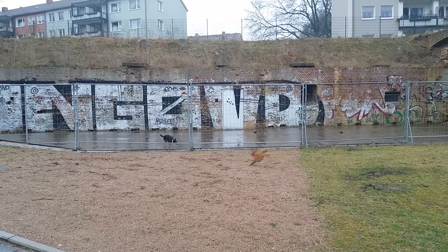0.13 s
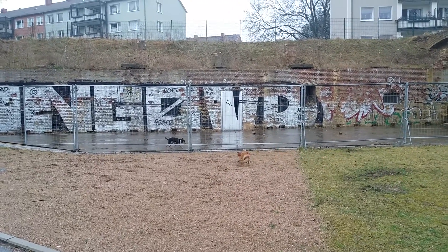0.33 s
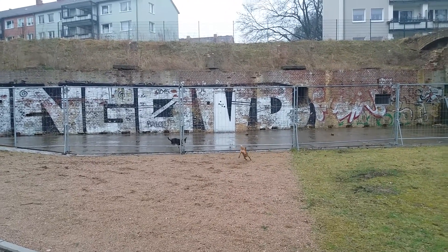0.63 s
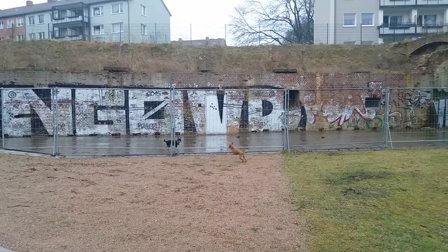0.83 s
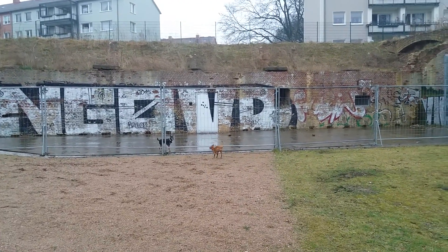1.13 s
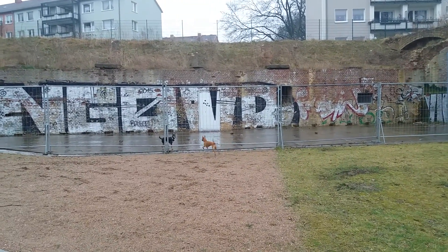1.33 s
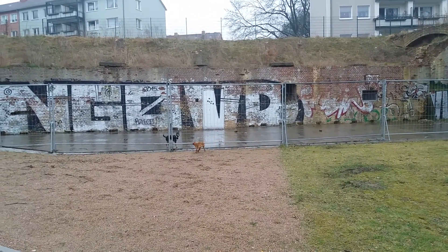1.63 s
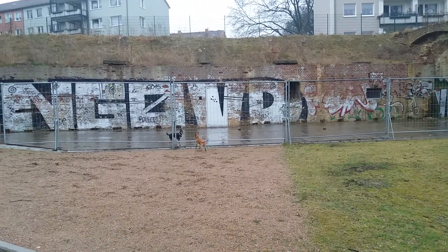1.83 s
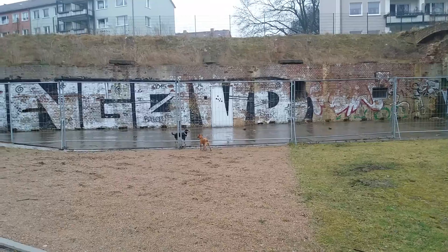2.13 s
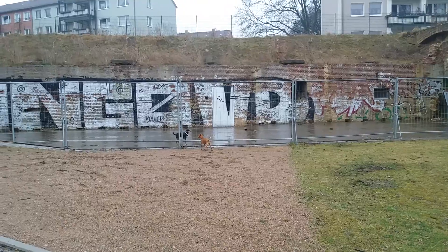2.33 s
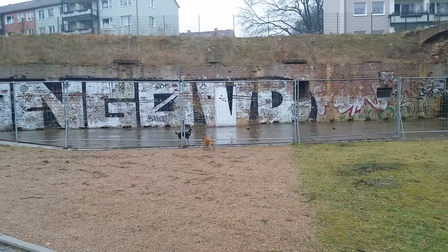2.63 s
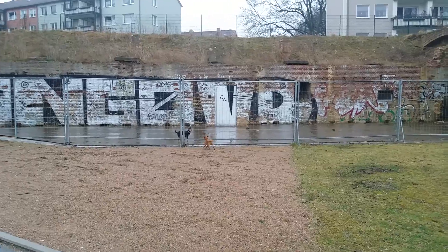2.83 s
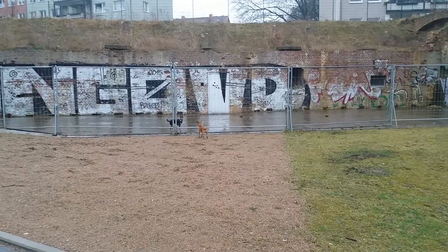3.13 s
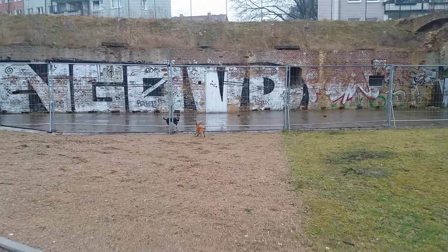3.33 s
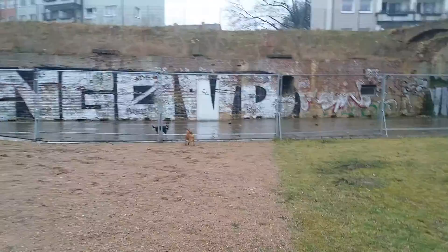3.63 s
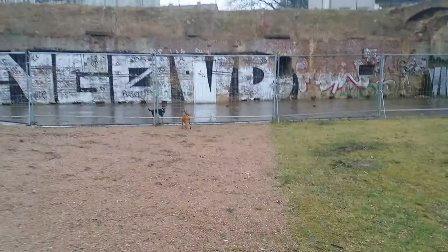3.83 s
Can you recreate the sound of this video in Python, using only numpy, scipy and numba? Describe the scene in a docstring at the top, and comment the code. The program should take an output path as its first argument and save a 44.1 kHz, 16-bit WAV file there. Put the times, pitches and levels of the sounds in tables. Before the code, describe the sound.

A small dog yaps twice quickly, then three more times with pauses, each bark echoing off a wall across an open yard. Wind buffets the microphone over faint distant traffic.

```python
"""Wind buffets the microphone over a distant town as a small dog yaps twice, across a gravel yard.
Each bark rises as a rasp and clears into a falling tone; a long brick wall slaps it back.
Grit crunches faintly close by. A bird chirps once at 1.1 s; the dog yaps again at 1.7 s and 2.8 s.
Around the fifth bark, at 3.5 s, the grit crunches louder and a faint hum swells and fades."""
import sys
import numpy as np
from scipy import signal
from scipy.fft import rfft, irfft, next_fast_len
from scipy.io import wavfile
from scipy.ndimage import map_coordinates
from numba import njit

SR = 44100
rng = np.random.default_rng(int(sys.argv[2]) if len(sys.argv) > 2 else 0)


def inscribe(sig):
    """Save sig as 16-bit PCM at rate SR to the path in sys.argv[1].

    A 1-D sig is mono; a 2-D sig holds one channel per row.
    Samples are clipped to [-1, 1] before scaling.
    """
    pcm = np.round(np.clip(np.atleast_2d(sig).T, -1, 1) * 32767)
    wavfile.write(sys.argv[1], SR, pcm.astype(np.int16))


N = 176400
LEAD = SR // 10  # samples before time zero
SIZE = N + LEAD
AGE_S = np.arange(SIZE) / SR
TIME_S = AGE_S - LEAD / SR

# traffic wash: freq_hz, density_db
TOWN_SPECTRUM = [(70, 5.5), (200, 3.5), (400, -3), (600, -1), (1000, -0.5), (1500, -3.5), (2200, -7),
                 (3000, -11), (4500, -17.5), (5000, -28), (5600, -36)]
# hum bands: centre_hz, level_db
HUM_BANDS = [(210, -43), (326, -47)]
# wind envelope: time_s, level_db
GUST_LEVELS = [(0, -21), (.07, -33), (.15, -25.5), (.25, -28.5), (.34, -28), (.58, -27.5), (.69, -23.5),
               (.85, -30.5), (1.0, -36.5), (1.45, -40.5), (1.75, -33.5), (2.05, -42.5), (2.28, -35.5),
               (2.47, -47), (2.62, -35), (2.76, -39), (2.9, -29), (3.16, -30), (3.4, -37), (3.6, -35.5),
               (4, -38)]
# wind rumble: freq_hz, density_db
WIND_SPECTRUM = [(26, -41), (36, -22), (50, -7.5), (70, 0.5), (115, -0.5), (170, -7), (250, -12),
                 (400, -21), (700, -36), (1500, -54)]
# eddies on the microphone: centre_s, peak_db, pitch_hz, half_length_s
EDDIES = [(.038, -10, 108, 0.007), (.125, -20, 140, 0.0049), (.154, -20, 123, .007),
          (.624, -12.5, 140, 0.0051), (.67, -11, 140, 0.005), (1.125, -26.5, 120, 0.013),
          (2.113, -23.5, 92, 0.012), (2.26, -26, 140, .011), (2.698, -22, 119, 0.006),
          (2.901, -16, 104, 0.008), (2.924, -24, 101, 0.013), (3.002, -19, 140, .006),
          (3.079, -18.5, 115, 0.0066), (3.85, -24, 91, 0.012)]
# yard reverberation: centre_hz, relative_db, t60_s
TAIL_BANDS = [(450, -5, .6), (840, 0, 0.69), (1566, 2, 1.12), (2520, -5.5, 0.69), (4500, 5, 0.82),
              (8000, 2.5, 0.61)]
# bird call: time_s, pitch_hz, level_db
CHIRP_CURVE = [(1.087, 3290, -66), (1.102, 4250, -53), (1.118, 4450, -55), (1.145, 4410, -55),
               (1.152, 4450, -78)]
# stones: start_s, level_db, decay_s
CRUNCHES = [(.258, -46, 0.018), (0.779, -54, 0.014), (3.352, -46, 0.014), (3.364, -39, .002),
            (3.392, -37, 0.0044), (3.403, -40, 0.0032), (3.41, -44, 0.0022), (3.418, -44, 0.0033),
            (3.585, -36, .001)]
# crunch noise: freq_hz, density_db
GRIT_SPECTRUM = [(500, -5), (1500, 5), (3000, 9), (5000, -4.5), (9000, -14.5), (12000, -37)]
# bark toward the wall, against the direct path: freq_hz, gain_db
FORWARD_RESPONSE = [(400, -4), (800, -6), (1200, -5), (1600, 1), (2400, 0.5), (3500, 3.5), (5000, 0.5),
                    (8000, 0.5), (14000, -5)]
# throat resonances, mouth open: centre_hz, width_hz
THROAT_BANDS = [(850, 263), (1330, 314), (2150, 267)]
# throat filter on the overtones: freq_hz, gain_db
THROAT_RESPONSE = [(1200, 1), (1700, -3.5), (2000, 0), (2400, 2.5), (2680, -8), (3000, -9.5), (3500, -17),
                   (4200, -38), (4750, -22.5), (5900, -44.5), (6400, -37), (7200, -38), (8000, -35)]
# upper muzzle resonances: centre_hz, width_hz, relative_db
MUZZLE_BANDS = [(3420, 440, -26), (4740, 390, -31), (5350, 580, -35), (6960, 970, -40)]
# breath hiss: freq_hz, density_db
BREATH_SPECTRUM = [(250, -4), (500, 3.5), (1500, 3.5), (2600, -12), (3000, -12.5), (4100, -21), (5300, -19),
                   (6200, -27), (9000, -30), (11000, -37.5), (15000, -52)]
# one curve per bark: time_s, pitch_hz, tone_db, rasp_db, roughness_ratio
BARK_CONTOURS = [
    [(-.06, 760, -43, -42, 0.44), (-.02, 1196, -22.5, -38, 0.65), (.008, 1346, -30, -34, .3),
     (.025, 1256, -33, -35, 0.42), (.044, 1155, -48, -33, 0.17), (.056, 893, -34.5, -36, 0.2),
     (.066, 773, -27, -56, 0.2)],
    [(.289, 688, -30.5, -35, 0.24), (.312, 803, -28.5, -24, 0.52), (.335, 923, -27, -31, 0.65),
     (.358, 980, -26.5, -23.5, 0.63), (.384, 920, -17.5, -37.5, 0.09), (.400, 797, -24.5, -42, 0)],
    [(1.733, 682, -34, -31.5, 0.56), (1.751, 794, -28.5, -26, 0.56), (1.776, 1326, -33, -27.5, 0.8),
     (1.793, 1244, -35, -27, 0.13), (1.801, 1202, -22.5, -35, 0), (1.822, 1172, -25, -35.5, 0.13),
     (1.835, 863, -28.5, -35, 0), (1.842, 773, -24.5, -31, 0)],
    [(2.751, 735.7, -32.5, -41, .25), (2.765, 819.4, -31, -28, 0.54), (2.803, 900, -40.5, -27, 1),
     (2.838, 924, -27.5, -29, 0.75), (2.854, 799, -22.5, -37, 0), (2.863, 690, -33.5, -38, 0.17)],
    [(3.493, 775, -29, -38.5, .1), (3.520, 835.3, -32.5, -29, 0.38), (3.555, 911.5, -32, -31.5, 0.8),
     (3.564, 871.7, -24.5, -29, 0.54), (3.586, 870, -29, -28, .35), (3.603, 760, -27, -36.5, 0.13)],
]
# per bark: second_partial_db, higher_partials_db, formant_ratio, throat1_db, throat2_db, throat3_db,
# echo_delay_s, echo_db
BARK_TIMBRES = [ (-11.5, -9.5, 1.132, 0.5, 3.5, -1, .05, -8.5),
                (-13.5, -16, 1.103, 3, -8.5, -1.5, 0.051, -4),
                (-11.5, -13.5, 1.017, -1, -1.5, -5.5, .046, 1),
                (-16, -23, 0.965, -3.5, 0.5, -5.5, 0.05, -2), (-16, -24, 1.015, 3.5, -0.5, -7.5, .047, -2)]


def amp(db):
    """Decibels to gain."""
    return 10 ** (np.asarray(db) / 20)


def unit_rms(x):
    """Scale to rms 1."""
    return x / np.sqrt(np.mean(x ** 2))


def shaped_noise(spectrum):
    """Noise through (freq_hz, density_db) points, rolled off past both ends; rms 1."""
    hz, db = np.array(spectrum, float).T
    size = next_fast_len(SIZE, True)
    log_hz = np.log(np.maximum(np.arange(size // 2 + 1) * SR / size, 1))
    outside = np.maximum(np.log(hz[0]) - log_hz, 0) + np.maximum(log_hz - np.log(hz[-1]), 0)
    gain = amp(np.interp(log_hz, np.log(hz), db) - 80 * outside)
    return unit_rms(irfft(rfft(rng.standard_normal(size)) * gain, size)[:SIZE])


def wander(rate_hz):
    """Smooth random curve, rms 1."""
    knots = rng.standard_normal(N // 8)
    return unit_rms(map_coordinates(knots, [TIME_S * rate_hz], order=2, mode="wrap"))


@njit
def bandpass(x, centre_hz, width_hz):
    """State-variable band-pass with a moving centre."""
    y, band, low = np.empty(len(x)), 0., 0.
    for i in range(len(x)):
        g, damping = np.tan(np.pi * centre_hz[i] / SR), width_hz / centre_hz[i]
        v = (band + g * (x[i] - low)) / (1 + g * (g + damping))
        band, low = 2 * v - band, low + 2 * g * v
        y[i] = damping * v
    return y


def band_noise(centre_hz, width_hz):
    """Noise band-passed twice, rms 1."""
    centre_hz, width_hz = centre_hz * np.ones(SIZE), float(width_hz)
    once = bandpass(rng.standard_normal(SIZE), centre_hz, width_hz)
    return unit_rms(bandpass(once, centre_hz, width_hz))


def town(wash_db=-46.5, hum_peak_s=3.635, hum_half_length_s=0.22, hiss_db=-68):
    """Distant traffic wash, a passing hum and an even hiss."""
    wash = amp(wash_db + .5 * wander(5.31)) * shaped_noise(TOWN_SPECTRUM)
    swell = np.exp(-((TIME_S - hum_peak_s) / hum_half_length_s) ** 2)
    hum = swell * sum(amp(db) * band_noise(hz, width_hz=13.7) for hz, db in HUM_BANDS)
    hiss = amp(hiss_db) * shaped_noise([(2000, -3), (7000, 0.5), (10000, 2.0), (16000, 0.5)])
    return wash + hum + hiss


def wind(flutter_db=1.9, flutter_hz=28.04):
    """Gusts rumble and flutter; single eddies thump the microphone."""
    gust_db = np.interp(TIME_S, *np.array(GUST_LEVELS).T)
    out = shaped_noise(WIND_SPECTRUM) * amp(gust_db + flutter_db * wander(flutter_hz))
    for centre_s, db, hz, half_length_s in EDDIES:
        offset_s = TIME_S - centre_s
        envelope = amp(db) * np.exp(-(offset_s / half_length_s) ** 2)
        out += envelope * np.sin(2 * np.pi * (hz * offset_s + rng.random()))
    return out


def yard(x, early_db=-8, early_s=0.14, early_decay_s=.2, tail_db=-14.5, tail_delay_s=0.029):
    """Scattered reflections from fence and bank, then a tail from the houses."""
    tail = sum(amp(db) * band_noise(hz, hz * 0.83) * amp(-60 * AGE_S / t60_s)
               for hz, db, t60_s in TAIL_BANDS)
    tail *= np.clip(AGE_S / tail_delay_s - 1, 0, 1)
    early = rng.standard_normal(SIZE) * (rng.random(SIZE) < .015)
    early *= np.exp(-AGE_S / early_decay_s) * (AGE_S < early_s)
    response = amp(tail_db) * tail / np.linalg.norm(tail) + amp(early_db) * early / np.linalg.norm(early)
    return signal.fftconvolve(x, response)[:SIZE]


def bird():
    """One thin chirp slides up and holds, ringing in the yard."""
    times_s, hz, db = np.array(CHIRP_CURVE).T
    pitch_hz = np.interp(TIME_S, times_s, hz) * (1 + 0.0027 * wander(300))
    envelope = amp(np.interp(TIME_S, times_s, db)) * (TIME_S > times_s[0]) * (TIME_S < times_s[-1])
    chirp = envelope * np.sin(2 * np.pi * np.cumsum(pitch_hz) / SR)
    return chirp + yard(chirp)


def grit():
    """Small stones crunch close by: decaying noise bursts."""
    envelope = sum(amp(db) * (TIME_S >= start_s) * np.exp(-np.abs(TIME_S - start_s) / decay_s)
                   for start_s, db, decay_s in CRUNCHES)
    return envelope * shaped_noise(GRIT_SPECTRUM)


def toward_wall(x):
    """The dog faces the wall, so its echoes are brighter than the direct bark."""
    size = next_fast_len(SIZE, True)
    hz, db = np.array(FORWARD_RESPONSE).T
    bins_hz = np.maximum(np.arange(size // 2 + 1) * SR / size, 1)
    gain = amp(np.interp(np.log(bins_hz), np.log(hz), db))
    return irfft(rfft(x, size) * gain, size)[:SIZE]


def bark(contour, second_db, higher_db, formant_ratio, throat_db):
    """A tone that shakes then clears, a rattling rasp and breath, through the opening throat."""
    attack_s, release_s, opening_s = 0.0091, 0.0055, 0.054
    jitter, shimmer, rattle_depth = 0.1028, 0.98, 0.3
    closed_ratio, closed_db, breath_db, rasp_top_hz = 0.79, -13.5, -11, 2640
    times_s, *columns = np.array(contour).T
    pitch_hz, tone_db, rasp_db, roughness = (np.interp(TIME_S, times_s, c) for c in columns)
    since_s, left_s = TIME_S - times_s[0], times_s[-1] - TIME_S
    gate = np.clip(since_s / attack_s + 1, 0, 1) * np.clip(left_s / release_s + 1, 0, 1)
    # mouth opens: resonances rise, upper ones come in
    closed = np.clip(1 - since_s / opening_s, 0, 1)
    shift = formant_ratio * (1 + (closed_ratio - 1) * closed)
    upper_gain = amp(closed_db * closed)

    phase = 2 * np.pi * np.cumsum(pitch_hz * (1 + jitter * roughness * wander(rate_hz=329.6))) / SR
    overtones = 0
    for k in range(2, 7):
        response_db = np.interp(k * pitch_hz, *np.array(THROAT_RESPONSE).T)
        overtones += amp((second_db if k == 2 else higher_db) + response_db) * np.sin(k * phase)
    rattle = np.tanh(wander(rate_hz=280))
    tone = (np.sin(phase) + upper_gain * overtones) * np.sqrt(2) * (1 + shimmer * rattle * roughness)

    rasp = sum(amp(db) * band_noise(hz * shift, width_hz) * upper_gain ** (k / 2)
               for k, ((hz, width_hz), db) in enumerate(zip(THROAT_BANDS, throat_db)))
    rasp *= unit_rms(1 + rattle_depth * rattle)
    rasp = signal.sosfilt(signal.butter(8, rasp_top_hz, fs=SR, output="sos"), rasp)
    breath = amp(breath_db) * shaped_noise(BREATH_SPECTRUM)
    breath += sum(amp(db) * band_noise(hz * formant_ratio, width_hz) for hz, width_hz, db in MUZZLE_BANDS)
    return gate * (amp(tone_db) * tone + amp(rasp_db) * (0.65 * rasp + upper_gain * breath))


def dog():
    """Five barks, each with its wall slap, in the yard."""
    direct, slaps = 0, 0
    for contour, timbre in zip(BARK_CONTOURS, BARK_TIMBRES):
        second_db, higher_db, formant_ratio, *throat_db, delay_s, echo_db = timbre
        voice = bark(contour, second_db, higher_db, formant_ratio, throat_db)
        direct += voice
        slaps += amp(echo_db) * np.interp(TIME_S - delay_s, TIME_S, voice, left=0)
    return direct + toward_wall(slaps) + yard(toward_wall(direct))


def scene():
    """Mono mix, from time zero."""
    return (dog() + wind() + town() + bird() + grit())[None, LEAD:]


def record(dry, top_hz=15700):
    """The recorder cuts the top."""
    return signal.sosfilt(signal.ellip(10, .1, 80, top_hz, fs=SR, output="sos"), dry)


dry = scene()
out = record(dry)
inscribe(out)
```